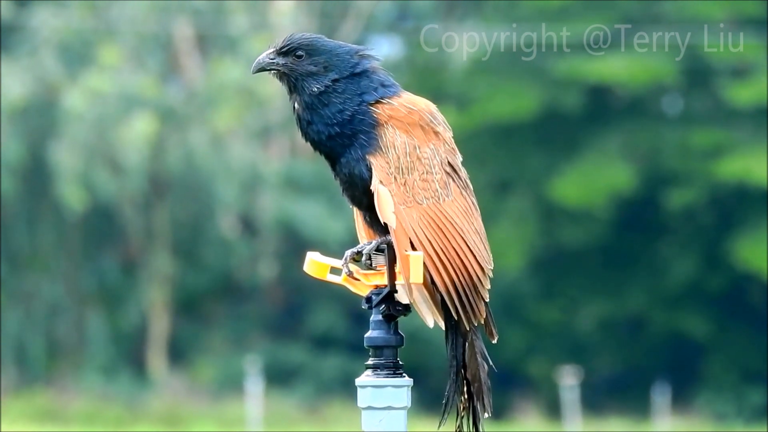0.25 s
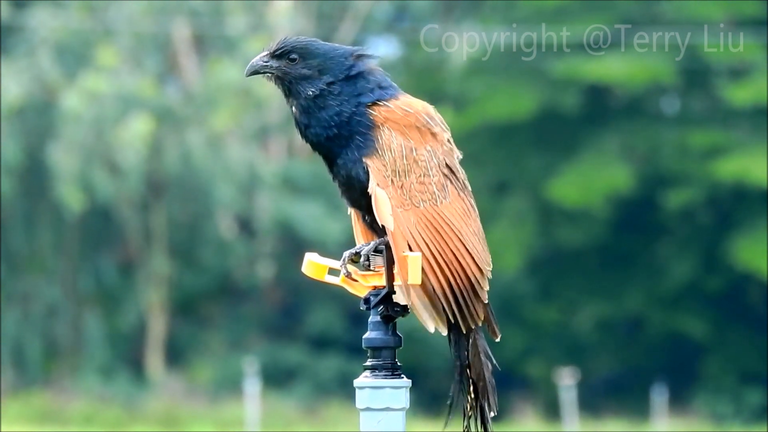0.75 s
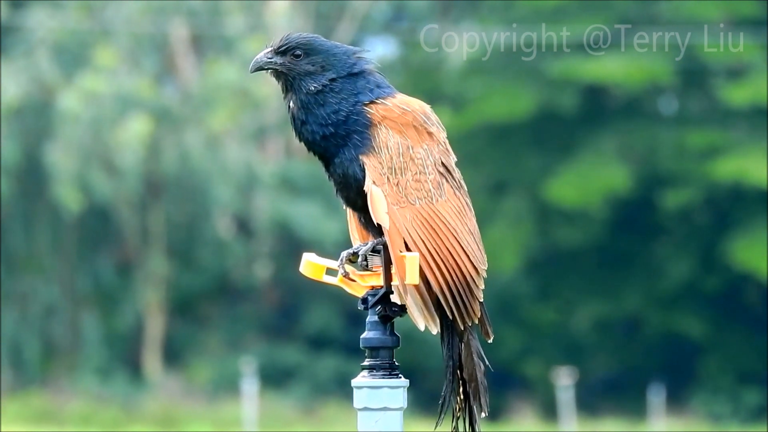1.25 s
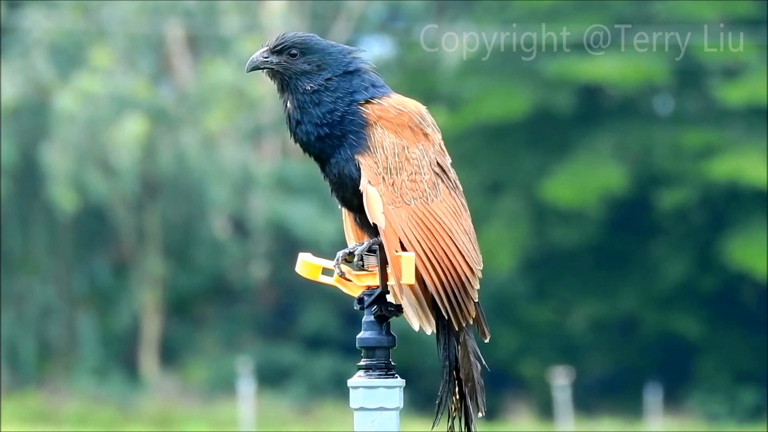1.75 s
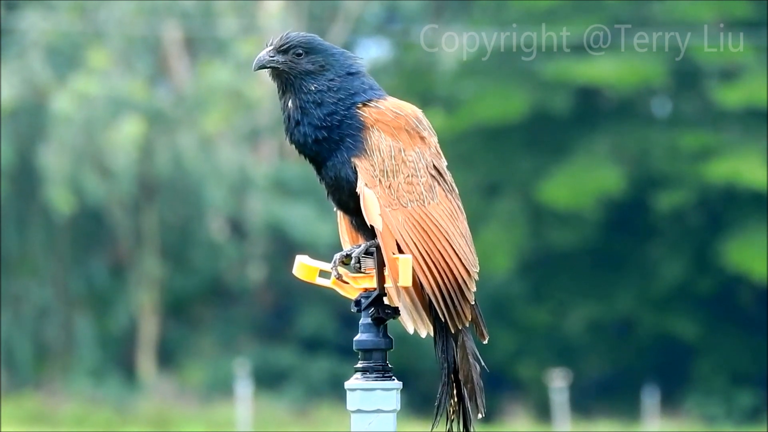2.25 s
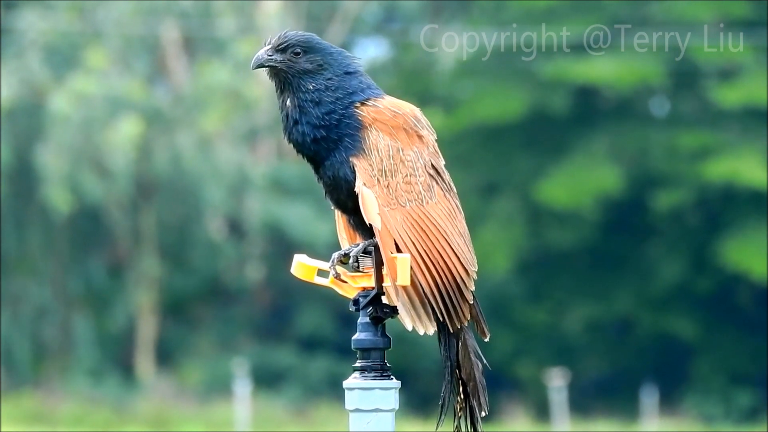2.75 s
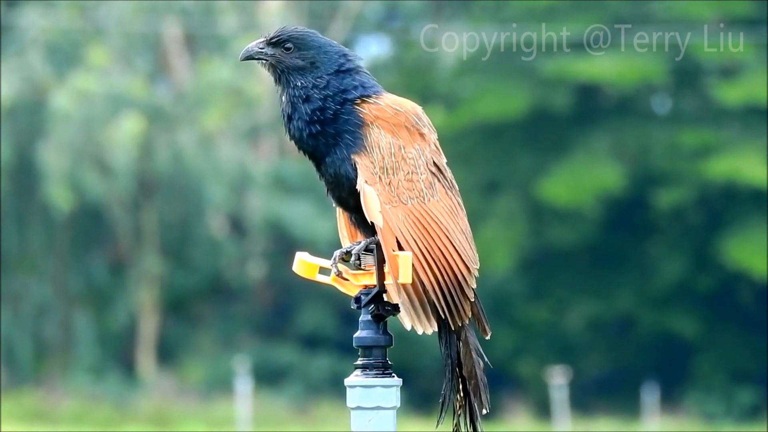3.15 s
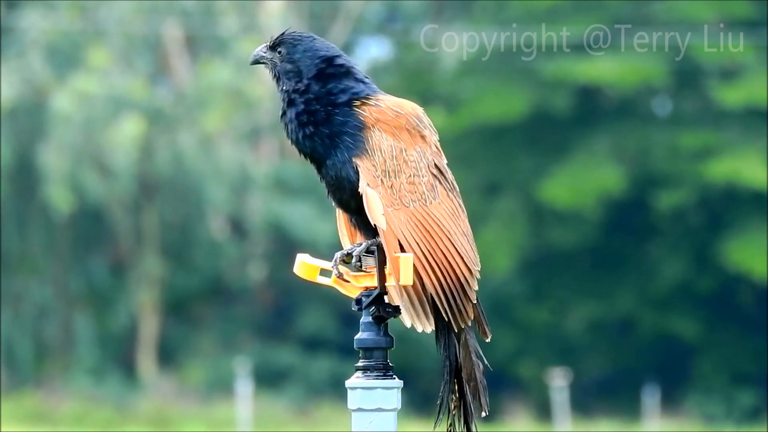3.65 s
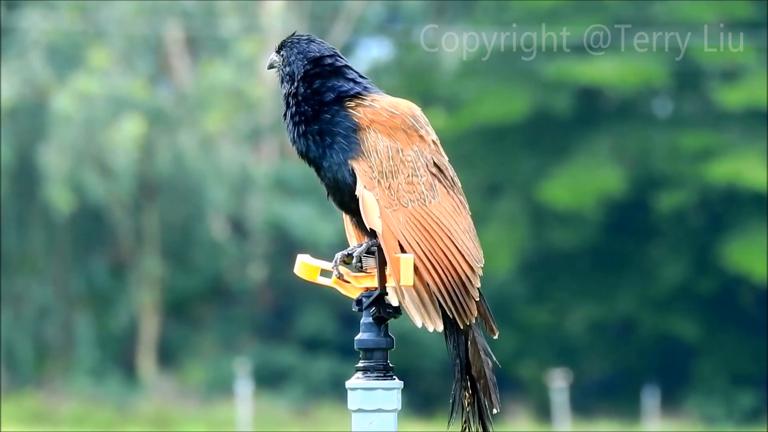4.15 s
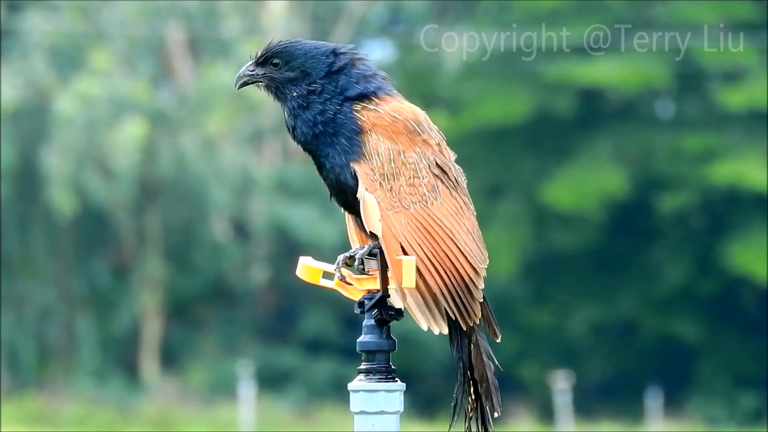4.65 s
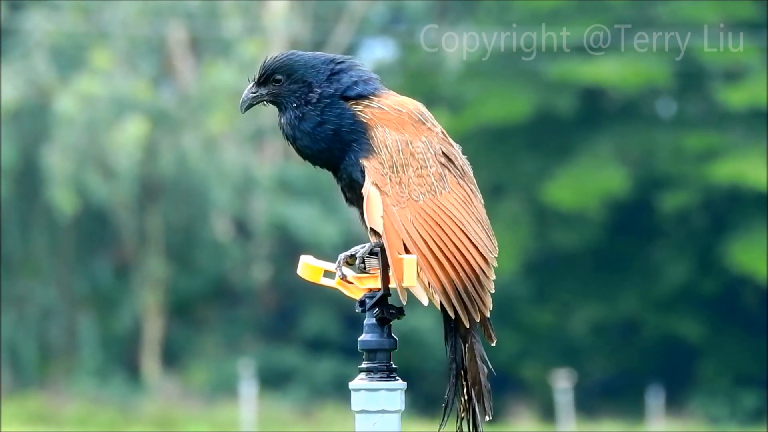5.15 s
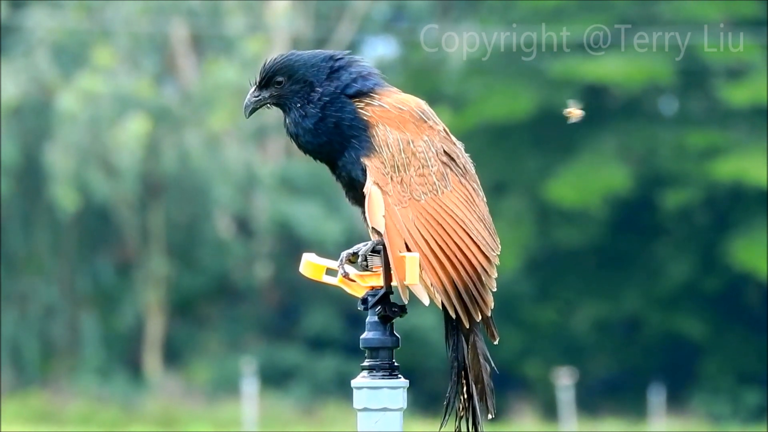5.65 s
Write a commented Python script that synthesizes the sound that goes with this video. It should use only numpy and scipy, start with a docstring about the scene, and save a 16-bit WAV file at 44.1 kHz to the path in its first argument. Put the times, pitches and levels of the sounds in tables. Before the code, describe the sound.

Outdoors by trees, a large bird lets out clipped, hollow hoots within the first second, then stays quiet until one lower rising hoot near five seconds. Crickets chirp quickly and a cicada buzzes steadily above, while far small birds whistle faintly and distant traffic rumbles underneath. The stereo microphone hears the hoots close and fairly dry.

```python
"""In a wooded field, a coucal gives a few short round hoots, each a near sine that slides in pitch.
Crickets chirp in even runs of short falling tones; a cicada buzzes as pulsed noise through a resonance.
Far small birds whistle and twitter in gliding sines, hoarse notes sound between them, and a twig snaps.
Distant traffic rumbles as shaped noise with a faint engine hum, under a blur of far insects."""
import sys
import numpy as np
from scipy import signal
from scipy.io import wavfile
from scipy.ndimage import uniform_filter1d

SR = 44100
rng = np.random.default_rng(int(sys.argv[2]) if len(sys.argv) > 2 else 0)


def to_wav(sig):
    """Store sig (one row per channel, or 1-D mono) as 16-bit WAV at the path in sys.argv[1].

    Samples outside -1..1 are clipped; the rate is SR.
    """
    pcm = np.clip(np.atleast_2d(sig), -1, 1) * 32767
    pcm = np.round(pcm).astype(np.int16)
    wavfile.write(sys.argv[1], SR, pcm.T)  # frames by channels


N = 261072

# Short hoots: (start [s], attack [s], hold [s], tail [s], held level [dB], pitch after the attack [Hz])
HIGH_HOOTS = [(-.025, .006, .015, .003, -25, 810), (.102, .011, .005, 0, -27.5, 740),
              (.7655, .0065, .011, .012, -17, 832), (.853, .007, .013, .008, -19.3, 808),
              (.987, .009, .007, 0, -23.3, 772)]
# One lower hoot, mostly rising: (time [s], level [dB], pitch [Hz])
LOW_HOOT = [(4.95, -43, 390), (4.958, -22, 416), (4.968, -15, 428), (4.982, -14.3, 447),
            (4.996, -16.3, 456), (5.005, -23, 450), (5.013, -44, 445)]
# The swollen throat passes little above the fundamental: (multiple of the pitch, level under it [dB])
HOOT_OVERTONES = [(2, -41), (3, -44)]

# Even runs of cricket chirps: (first chirp [s], last chirp [s], number of chirps, level [dB])
# The nearest cricket, timed by its first stroke
HIGH_CHIRPS = [(-.045, .252, 3, -38.5), (1.047, 1.047, 1, -38.5), (1.185, 1.491, 3, -38.5),
               (1.634, 1.634, 1, -38), (1.808, 3.438, 12, -38.5), (3.609, 3.757, 2, -39),
               (3.919, 4.659, 6, -38.5), (4.81, 5.267, 4, -39), (5.439, 5.439, 1, -39)]
# A low cricket with two round strokes a chirp; same columns
LOW_CHIRPS = [(.05, .734, 7, -42.5), (1.291, 1.587, 4, -43), (1.699, 2.486, 8, -43.5),
              (3.214, 3.771, 6, -43.5), (3.879, 4.203, 4, -43.5), (4.805, 5.01, 3, -43.5),
              (5.118, 5.882, 8, -43.5)]
# A cricket with two steeply falling strokes a chirp; same columns
SWEPT_CHIRPS = [(.112, .642, 6, -43.5), (.766, .872, 2, -44), (.966, 1.072, 2, -45),
                (1.33, 1.855, 6, -43.5), (1.965, 2.399, 5, -45), (2.767, 2.878, 2, -46.5),
                (2.978, 3.397, 5, -45), (3.508, 3.941, 5, -43.5), (4.416, 4.734, 4, -45.5),
                (4.847, 5.164, 4, -46), (5.274, 5.503, 3, -46)]
# Two crickets farther off, timed by about the middle of each chirp; same columns
LEFT_CHIRPS = [(0.039, .325, 3, -42), (.49, 0.934, 4, -43.5), (1.087, 1.845, 6, -42),
               (1.981, 2.114, 2, -42), (2.3, 3.035, 6, -42.5), (3.196, 3.472, 3, -42.5),
               (3.648, 3.938, 3, -44), (4.125, 4.285, 2, -41.5), (4.447, 5.134, 6, -43.5),
               (5.29, 5.453, 2, -47), (5.543, 5.853, 3, -43.5)]
RIGHT_CHIRPS = [(0.111, .54, 4, -44), (0.632, 0.946, 3, -45.5), (1.098, 1.228, 2, -44),
                (1.403, 2.224, 7, -42.5), (2.382, 2.673, 3, -44), (2.764, 3.055, 3, -43),
                (3.187, 3.785, 5, -43), (3.89, 4.149, 3, -43), (4.288, 5.158, 7, -43.5),
                (5.289, 5.822, 5, -43)]
# One extra pair of strokes as the nearest cricket resumes: (time [s], level [dB])
WARM_UP = (1.022, -40)
# Pitches each stroke of the nearest cricket falls through: (pitch [Hz])
HIGH_STROKE_HZ = [6630, 6075, 5400]

# Where the cicada swells anew: (time [s], base level [dB])
CICADA_PHRASES = [(-.02, -39.5), (.9, -40), (1.98, -40.5), (2.98, -40.5), (3.96, -40.5), (4.95, -40),
                  (5.95, -40)]
# The course of each phrase: (share of the phrase [0 to 1], added level [dB], body resonance [Hz])
PHRASE_SHAPE = [(0, -3, 7000), (.12, -3, 7200), (.55, -0.5, 7210), (.8, 0.5, 7250), (.93, 0.5, 7150),
                (1, -4.5, 7060)]
# Brief level changes in the band around 7 kHz, mostly short gaps: (time [s], added level [dB])
BAND_GAPS = [(.413, -9), (.884, 2), (1.37, -12), (1.453, -13), (1.973, 0), (2.04, -6), (2.247, -7),
             (3.43, -6), (3.526, -4), (4.951, -6)]

# A small bird repeats one rising call: (time [s], length [s], level [dB])
RISING_CALLS = [(.327, .057, -50), (.496, .055, -48.5), (.668, .06, -49), (.847, .058, -49),
                (1.029, .05, -48.5), (5.622, .048, -54), (5.79, .038, -46.5)]
# Pitches the rising call passes through: (pitch [Hz])
CALL_HZ = [2914, 3640, 4880]
# Pitches of the short low note that leads each call: (pitch [Hz])
LEAD_HZ = [2480, 2660]
# Whistles of other far birds: (time [s], length [s], start pitch [Hz], end pitch [Hz], level [dB])
WHISTLES = [(.14, .021, 3730, 3950, -46), (0.157, 0.024, 3050, 3380, -47), (0.75, 0.078, 2810, 2680, -57),
            (.8, 0.055, 3720, 3650, -59), (1.87, .04, 2840, 2620, -57), (2.044, 0.085, 2720, 2720, -52),
            (2.168, 0.034, 2770, 2700, -55), (2.361, .018, 2840, 2680, -58),
            (2.407, 0.021, 3050, 3130, -51), (2.453, 0.032, 3050, 3155, -51),
            (2.715, .034, 3870, 3920, -58), (2.99, .03, 3330, 3330, -54), (3.001, .022, 3080, 3100, -48.5),
            (3.027, .034, 3380, 3080, -55), (3.476, .022, 3800, 3450, -55), (3.485, 0.055, 3430, 3420, -52),
            (3.542, 0.023, 3080, 3020, -58), (3.582, .046, 3220, 2970, -55), (3.985, .09, 4250, 3800, -59),
            (4.41, .027, 3850, 3730, -54)]
# Hoarse far notes: (time [s], length [s], start [Hz], middle [Hz], end pitch [Hz], level [dB])
HOARSE_NOTES = [(0.158, 0.099, 3450, 3685, 3500, -45.5), (1.678, 0.05, 580, 562, 560, -45),
                (2.33, 0.1, 570, 573, 556, -51), (2.425, .05, 400, 393, 385, -52),
                (4.408, 0.1, 3400, 3430, 3500, -54.5), (4.421, 0.093, 2650, 2840, 2930, -58.5),
                (4.5, .05, 3350, 3350, 3320, -54), (5, .08, 3600, 3600, 3650, -57),
                (5.12, 0.054, 3400, 3250, 3180, -57), (5.278, 0.063, 3000, 2860, 2730, -56.5),
                (5.455, 0.073, 3300, 3070, 2800, -54)]
# One small snap: (time [s], level [dB], ring pitch [Hz])
TWIG = (1.513, -44, 3650)

# Tone colour of the low traffic wash: (frequency [Hz], relative level [dB per Hz])
RUMBLE_SPECTRUM = [(12, -64), (20, -32), (32, -43), (57, -4), (75, 1.5), (89, 0), (117, -6), (140, -5),
                   (196, -1.5), (317, -22), (420, -26), (550, -34.5), (920, -120)]
# Tone colour of far road and wind in the trees: (frequency [Hz], relative level [dB per Hz])
MURMUR_SPECTRUM = [(180, -33), (300, -26), (344, -15), (480, -0.5), (565, 0), (734, -6), (1030, -4),
                   (1180, -4.5), (1330, -4), (1610, -13), (1800, -10), (2490, -17), (2600, -24),
                   (3380, -46), (5720, -120)]
# Loudness of that murmur: (time [s], level [dB])
MURMUR_LEVEL = [(0, -51.5), (.5, -50.5), (2.3, -50.5), (4.3, -52), (5.92, -52)]
# Loudness of the engine tone: (time [s], level [dB])
HUM_LEVEL = [(0, -62), (.85, -60), (.95, -42), (2.2, -44), (2.5, -52), (3.0, -51), (3.15, -44), (3.3, -51),
             (3.7, -47), (4.2, -51), (5.92, -60)]
# Tone colour of the blur of far insects: (frequency [Hz], relative level [dB per Hz])
INSECT_SPECTRUM = [(1800, -34), (2300, -20), (2800, -17), (3600, -14.5), (4000, -13.5), (4800, -1.5),
                   (5500, 0.5), (6200, -5), (6600, -17), (8300, -37), (9000, -11), (10800, -25),
                   (12000, -32.5), (15000, -33.5), (15300, -45)]
# How alike background noise is in both ears: (frequency [Hz], likeness [0 to 1])
EAR_LIKENESS = [(60, 0.99), (180, 1), (310, 0.94), (550, 0.83), (950, 0.88), (1650, 0.67), (2860, 0.4),
                (4970, 0.16), (8640, 0.3), (10300, 1), (11200, 0.98), (15000, .995)]


def coucal():
    """Each hoot is a near sine from the closed beak and the swollen throat, with a weak echo."""
    out = np.zeros(N)
    for rows in [high_hoot(*row) for row in HIGH_HOOTS] + [LOW_HOOT]:
        s, db, hz = np.transpose(rows)
        t = np.arange(s[0], s[-1], 1 / SR)
        turns = np.cumsum(np.interp(t, s, hz)) / SR
        tone = np.cos(2 * np.pi * turns)
        for multiple, overtone_db in HOOT_OVERTONES:
            tone += amp(overtone_db) * np.cos(2 * np.pi * multiple * turns)
        level = uniform_filter1d(np.interp(t, s, amp(db)), size=80)
        level *= signal.windows.tukey(len(t), .1)  # soft ends
        add(out, s[0], np.sqrt(2) * level * tone)
    return out + echoes(out[None], t60=.2, db=-24, alike=.9)


def high_hoot(start, attack, hold, tail, db, hz):
    """Rows (time [s], level [dB], pitch [Hz]): attack from above, hold, softer tail, falling pitch."""
    drop_s, sag_s, release_s = .009, .011, .007  # step down to the tail, fall of pitch, release
    held = attack + hold
    end = held + drop_s + tail
    level_s = [0, attack, held, held + drop_s, end, end + release_s]
    pitch_s = [0, attack, end - sag_s, end, end + release_s]
    s = np.arange(0, level_s[-1], .001)
    level = np.interp(s, level_s, amp([-26, 0, 0, -8.5, -8.5, -28]))  # dB against the hold
    share = np.interp(s, pitch_s, [1.09, 1, 0.97, 0.914, 0.74])  # shares of the pitch
    return np.transpose([start + s, db + 20 * np.log10(level), hz * share])


def crickets():
    """Wing strokes sound as short falling tones: five voices with their own sides, and stray chirps."""
    high, low, swept, left, right = np.zeros((5, N))
    stray = np.zeros((2, N))
    stroke_s, low_stroke_s = .0105, .0172  # spacing of the two strokes in a pair
    pairs = .025 * np.arange(3)  # three pairs a chirp

    for s, db in evenly(HIGH_CHIRPS):
        chirp(high, s, db, np.r_[pairs, pairs + stroke_s], .0058, HIGH_STROKE_HZ, spread_db=0)
    chirp(high, *WARM_UP, [0, stroke_s], .0058, HIGH_STROKE_HZ, spread_db=0.7)
    for s, db in evenly(LOW_CHIRPS):
        chirp(low, s, db, [0, low_stroke_s], 0.012, [4650, 4400, 4200], spread_db=0.8)
    for s, db in evenly(SWEPT_CHIRPS):
        chirp(swept, s, db, [0, low_stroke_s], 0.013, [5400, 4500, 3850], spread_db=0.2)

    loose_pairs = np.cumsum(np.tile([.011, .014], 4)) - .054  # eight strokes around the middle
    for voice, runs in (left, LEFT_CHIRPS), (right, RIGHT_CHIRPS):
        for s, db in evenly(runs):
            hz = np.array([5880, 5470, 5080]) * (1 + .008 * rng.standard_normal())
            chirp(voice, s, db, loose_pairs, 0.0073, hz, spread_db=0.9)

    for when, pitch, side in rng.random((110, 3)):
        hz = (4600 + 600 * pitch) * np.array([1.12, 1, .9])
        ear = stray[int(2 * side)]
        chirp(ear, when * N / SR, -42.5, [0, low_stroke_s], .009, hz, spread_db=1)

    near = panned(high, 4.9) + panned(low, .3) + panned(swept, .3)
    far = panned(left, 12.5) + panned(right, -9.5) + stray
    far_echo = echoes(far, t60=.05, db=-4, alike=.2)
    tree_echo = echoes(near + far, t60=.18, db=-11, alike=.6)  # weak return from the trees
    return near + far + far_echo + tree_echo


def chirp(mix, s, db, strokes, length, hz, spread_db):
    """Adds one falling tone for each wing stroke; strokes lists their middles in seconds from s."""
    for later in strokes:
        level = amp(db + spread_db * rng.standard_normal())
        add(mix, s + later - length / 2, level * glide(length, hz, taper=0.89))


def evenly(runs):
    """The time and level of every chirp in the evenly spaced runs."""
    return [(s, db) for first, last, count, db in runs for s in np.linspace(first, last, round(count))]


def cicada():
    """Rapid clicks ring the body in phrases of about a second that swell, rise and sag in pitch."""
    t = np.arange(N) / SR
    starts, base_db = np.transpose(CICADA_PHRASES)
    share, swell_db, resonance_hz = np.transpose(PHRASE_SHAPE)
    phrase = np.interp(t, starts, np.arange(len(starts)))  # whole part: which phrase; rest: share of it
    db = base_db[phrase.astype(int)] + np.interp(phrase % 1, share, swell_db)
    gap_s = 0.027
    for s, change_db in BAND_GAPS:
        db += change_db * np.exp(-(2 * (t - s) / gap_s) ** 4)
    hz = np.interp(phrase % 1, share, resonance_hz)
    sound = buzz(per_s=171, jitter=0.0378, sharp=.4, hz=hz, width_hz=857, alike=0.92)
    return panned(amp(db) * sound, .55)


def buzz(per_s, jitter, sharp, hz, width_hz, alike):
    """Noise pulses, one for each click of the insect, ring a steep body resonance (made rms 1)."""
    wander = evened(uniform_filter1d(rng.standard_normal(N), size=4000))
    turns = np.cumsum(per_s * (1 + jitter * wander)) / SR
    common, left, right = rng.standard_normal((N, 3)).T
    pulses = np.sqrt(alike) * common + np.sqrt(1 - alike) * np.array([left, right])
    pulses *= np.exp(sharp * np.cos(2 * np.pi * turns))  # sharp: how peaked each click is
    for _ in range(3):
        pulses = resonate(pulses, hz, width_hz)
    return evened(pulses)


def small_birds():
    """Thin glides, roughened and smeared by distance, over the scattered twitter of a far flock."""
    out = np.zeros(N)
    for s, length, db in RISING_CALLS:
        add(out, s, amp(db) * glide(length, CALL_HZ, taper=0.1))
        add(out, s - 0.026, amp(db - 10) * glide(0.017, LEAD_HZ, taper=0.37))  # lead note
    for s, length, *hz, db in WHISTLES:
        add(out, s, amp(db) * glide(length, hz, taper=0.16))
    for when, pitch, bend, span, size in rng.random((90, 5)):  # the twitter
        hz = (2500 + 1400 * pitch) * (1 + 0.145 * (bend - .5) * np.array([-1, 0, 1]))
        note = glide(.015 + 0.0476 * span, hz, taper=0.77)
        add(out, when * N / SR, amp(-69 + 3.2 * size) * note)
    flutter = evened(uniform_filter1d(rng.standard_normal(N), size=400))
    out *= amp(2.2 * flutter)
    return panned(out, 0.46) + echoes(out[None], t60=0.35, db=-2, alike=0.73)


def hoarse_notes():
    """Glides shaken by fast chance, so each spreads into a grainy band about a tenth of its pitch wide."""
    out = np.zeros(N)
    for s, length, *hz, db in HOARSE_NOTES:
        tone = glide(length, hz, taper=0.53)
        span = int(8 * SR / hz[1])  # eight cycles of the middle pitch
        shake = uniform_filter1d(uniform_filter1d(rng.standard_normal(len(tone)), span), span)
        add(out, s, amp(db) * tone * evened(shake))
    return out + echoes(out[None], t60=0.12, db=-1.5, alike=0.91)


def twig():
    """A snap is a click of fast-fading noise with a short ring."""
    s, db, hz = TWIG
    out, t = np.zeros(N), np.arange(600) / SR
    ring = np.sin(2 * np.pi * hz * t)
    click = .5 * rng.standard_normal(600) * amp(-60 * t / .004)
    add(out, s, amp(db - 60 * t / 0.16) * (ring + click))
    return out


def traffic():
    """Low noise for wash and murmur, with one engine tone that comes and goes over an unsteady throb."""
    hum_hz = 149.4
    wash = amp(-37.5) * noise(RUMBLE_SPECTRUM, size=4096, patchy_db=0.4, drift_db=0.14)
    murmur = noise(MURMUR_SPECTRUM, size=2048, patchy_db=4.5, drift_db=1.34)
    murmur *= amp(level_curve(MURMUR_LEVEL))
    # narrow noise an octave below the tone
    throb = amp(-49.5) * evened(resonate(rng.standard_normal(N), hum_hz / 2, width_hz=4.6))
    tone = np.sqrt(2) * np.sin(2 * np.pi * hum_hz * np.arange(N) / SR)
    return wash + murmur + throb + amp(level_curve(HUM_LEVEL)) * tone


def far_insects():
    """Pulsed noise through resonances: a faint high katydid buzz and a lower trill that comes and goes."""
    katydid = amp(-58.5) * buzz(per_s=113, jitter=0.0078, sharp=0.15, hz=9835, width_hz=920, alike=0.92)
    waver = uniform_filter1d(uniform_filter1d(rng.standard_normal(N), size=8000), size=8000)
    trill = buzz(per_s=45, jitter=0.0314, sharp=0.14, hz=3350, width_hz=380, alike=0.19)
    return panned(katydid, .7) + amp(-66.5 + 6.5 * evened(waver)) * trill


def insect_blur():
    """So many far insects that they merge into patchy, slowly drifting noise."""
    return amp(-45) * noise(INSECT_SPECTRUM, size=512, patchy_db=5, drift_db=1.5)


def noise(spectrum, size, patchy_db, drift_db):
    """Random short-time spectra with small patches and slow drifts, partly alike in both ears (rms 1)."""
    frames, hz = 4 * N // size + 5, np.fft.rfftfreq(size, 1 / SR)
    a, b, c, d, patches, drift = rng.standard_normal((frames, len(hz), 6)).T
    patches = uniform_filter1d(uniform_filter1d(patches, size=4, axis=0), size=8, axis=1)
    drift = uniform_filter1d(uniform_filter1d(drift, size=8, axis=0), size=frames // 8, axis=1)
    same = read(EAR_LIKENESS, hz)[:, None]
    left = a + 1j * b
    right = same * left + np.sqrt(1 - same ** 2) * (c + 1j * d)
    level_db = read(spectrum, hz)[:, None] + patchy_db * evened(patches) + drift_db * evened(drift)
    spectra = np.array([left, right]) * amp(level_db)
    return evened(signal.istft(spectra, nperseg=size, noverlap=3 * size // 4)[1][:, :N])


def echoes(x, t60, db, alike):
    """Trunks and leaves scatter sound back: sparse taps of random sign, fading 60 dB in t60 seconds."""
    at = np.arange(100, SR // 2, 20)
    at = at + rng.integers(0, 20, (3, len(at)))
    taps = np.zeros((3, SR // 2 + 40))
    np.put_along_axis(taps, at, rng.choice([-1., 1.], at.shape) * amp(-60 * at / SR / t60), 1)
    taps = np.sqrt(alike) * taps[0] + np.sqrt(1 - alike) * taps[1:]  # shared part, own part of each ear
    return amp(db) * signal.oaconvolve(x, taps / np.linalg.norm(taps[0]), axes=1)[:, :N]


def resonate(x, hz, width_hz):
    """A resonance of gain 1: shifts the pitch hz down to zero, smooths, and shifts back."""
    turn = np.exp(2j * np.pi * np.cumsum(hz * np.ones(N)) / SR)
    r = np.exp(-np.pi * width_hz / SR)
    return 2 * (turn * signal.lfilter([1 - r], [1, -r], x / turn)).real


def glide(length, hz, taper):
    """A sine of rms 1 whose pitch passes through the given values, then faded at both ends."""
    u = np.linspace(0, 1, round(length * SR))
    turns = np.cumsum(np.interp(u, np.linspace(0, 1, len(hz)), hz)) / SR + rng.random()
    return np.sqrt(2) * np.sin(2 * np.pi * turns) * signal.windows.tukey(len(u), taper)


def amp(db):
    """Decibels to a plain factor."""
    return 10 ** (np.asarray(db) / 20)


def evened(x):
    """Scales a signal to rms 1."""
    return x / np.sqrt(np.mean(x ** 2) + 1e-20)


def read(points, hz):
    """Reads a table over frequency, with straight lines on a log scale."""
    f, value = np.transpose(points)
    return np.interp(np.log(hz + 1), np.log(f + 1), value)


def level_curve(rows):
    """Draws straight lines in dB through the (time [s], level [dB]) rows."""
    s, db = np.transpose(rows)
    return np.interp(np.arange(N) / SR, s, db)


def add(mix, s, sound):
    """Adds a sound to the mix at s seconds, cutting what falls outside."""
    at = round(s * SR)
    sound = sound[max(-at, 0):]
    part = mix[max(at, 0):][:len(sound)]
    part += sound[:len(part)]


def panned(x, db):
    """Makes the left ear db louder than the right."""
    return x * amp([[db / 2], [-db / 2]])


def scene():
    """All sources together, left and right."""
    birds = coucal() + small_birds() + hoarse_notes()
    insects = crickets() + cicada() + far_insects() + insect_blur()
    return birds + insects + twig() + traffic()


def record(dry):
    """A steep low-pass takes away the treble above about 15.75 kHz."""
    low_pass = signal.firwin(2047, 15750, window=("kaiser", 11), fs=SR)
    return signal.oaconvolve(dry, low_pass[None], "same")


dry = scene()
out = record(dry)
to_wav(out)
```